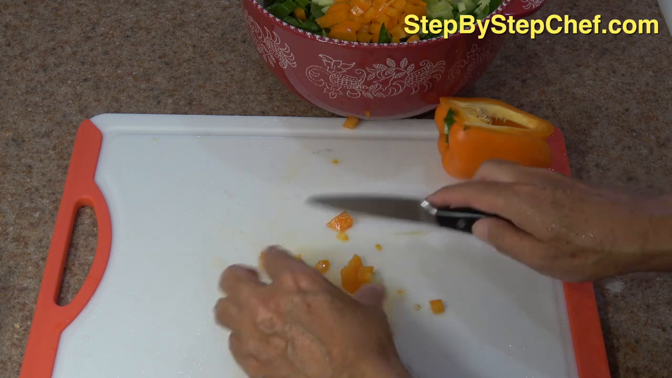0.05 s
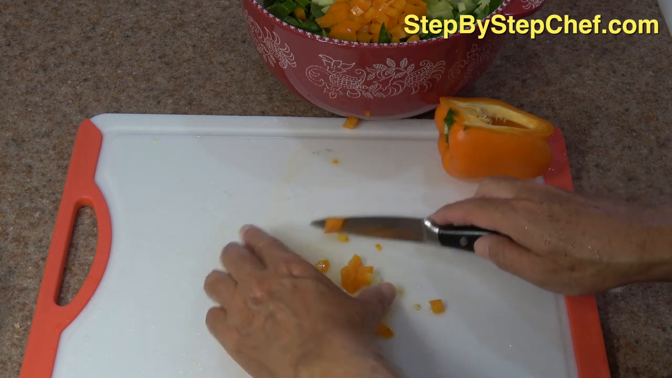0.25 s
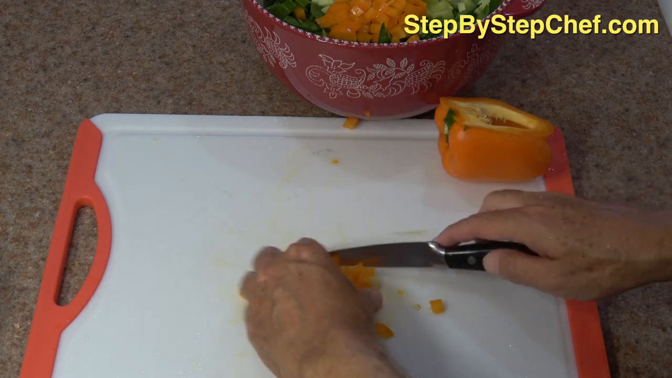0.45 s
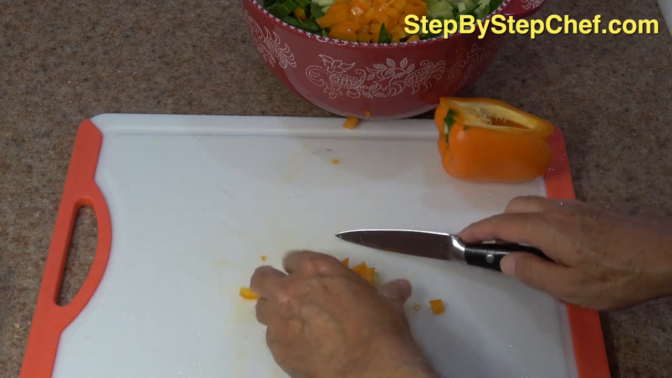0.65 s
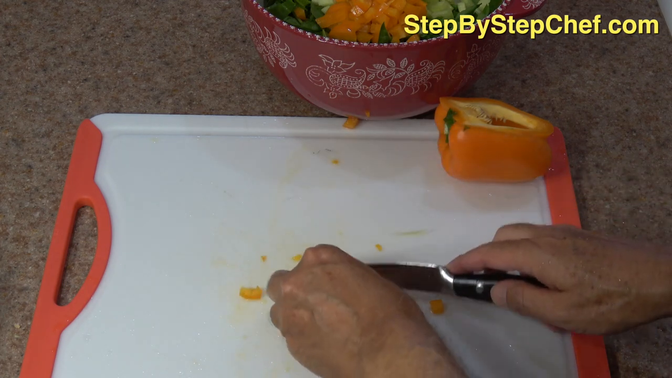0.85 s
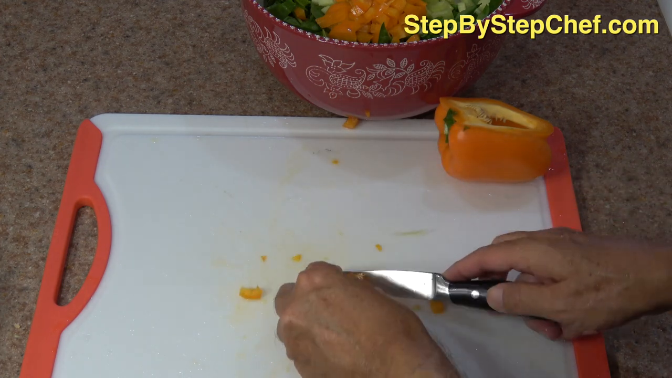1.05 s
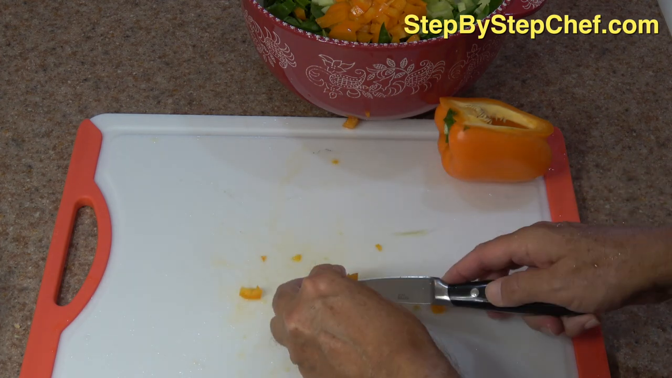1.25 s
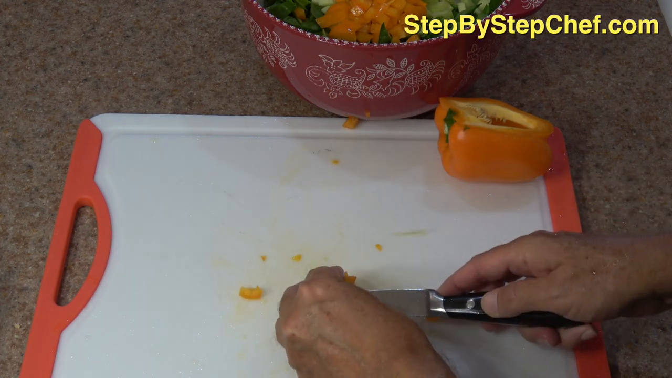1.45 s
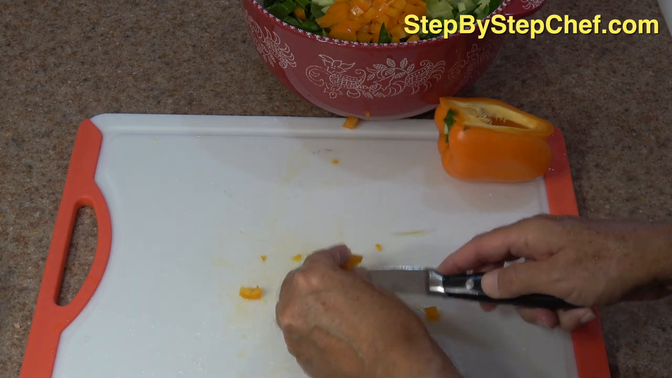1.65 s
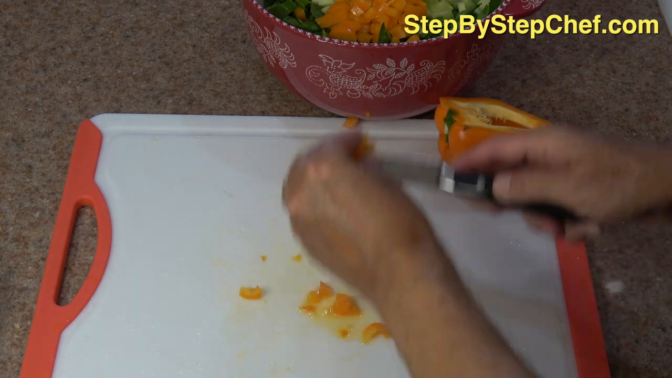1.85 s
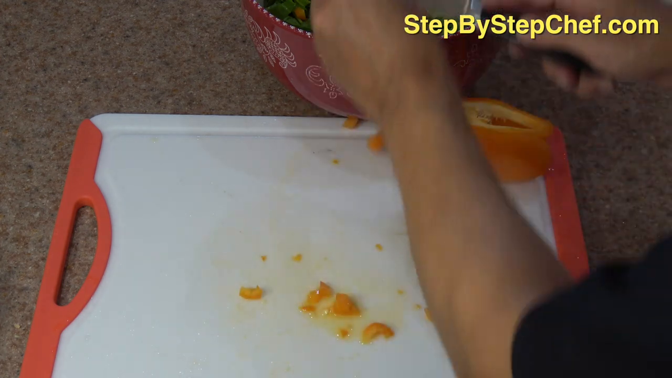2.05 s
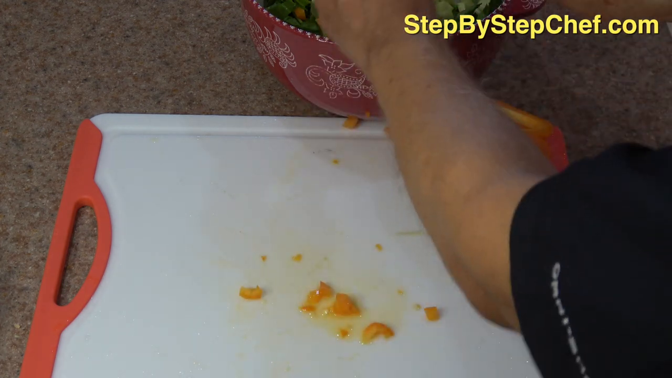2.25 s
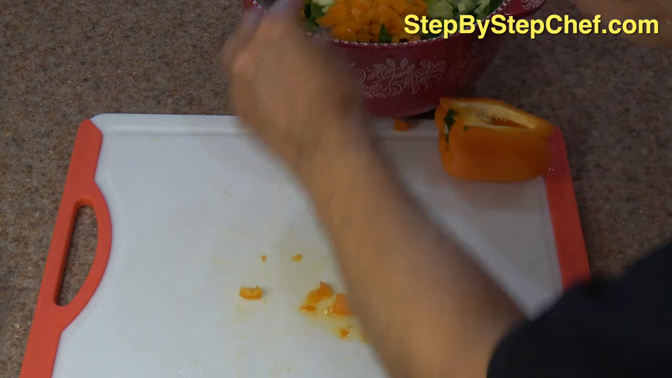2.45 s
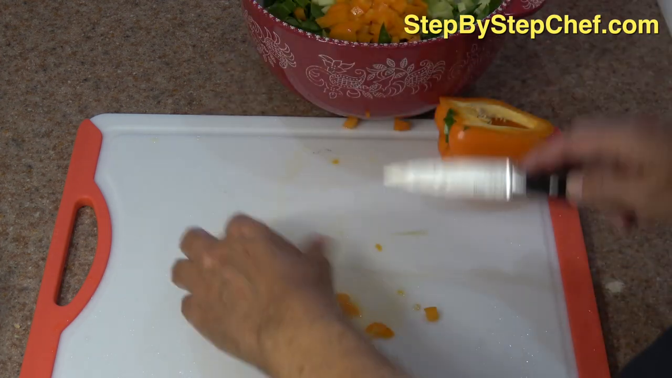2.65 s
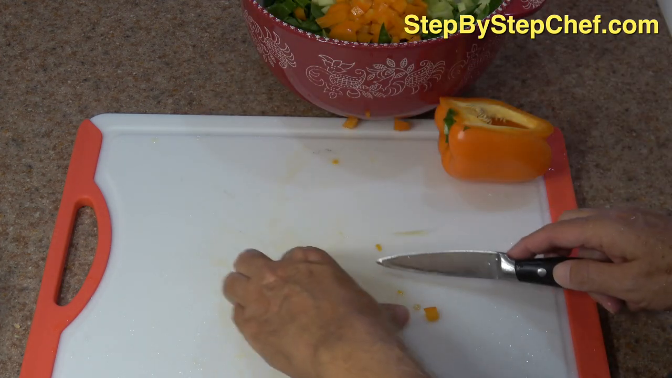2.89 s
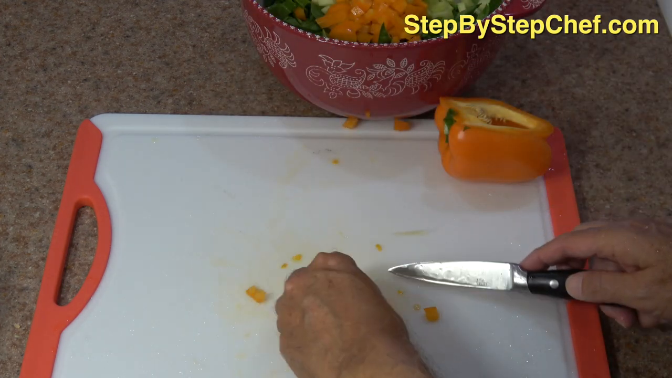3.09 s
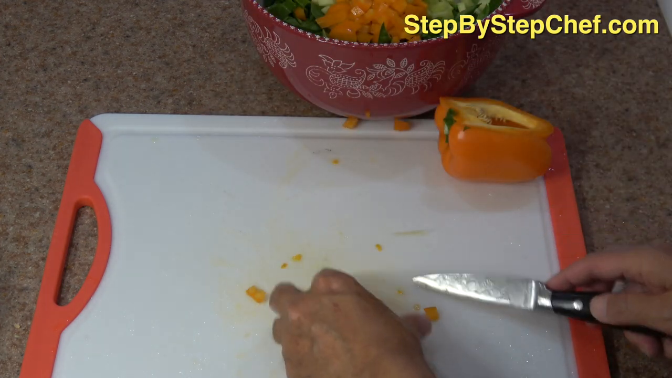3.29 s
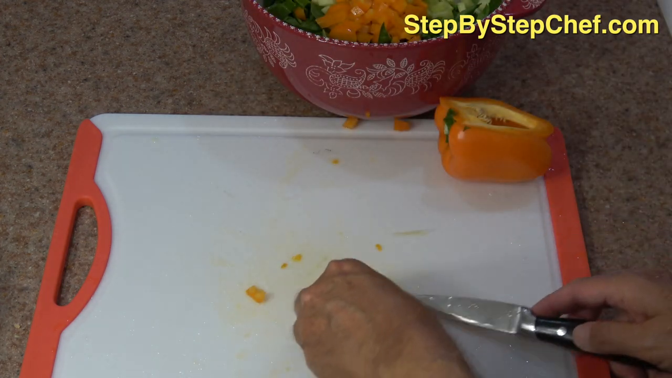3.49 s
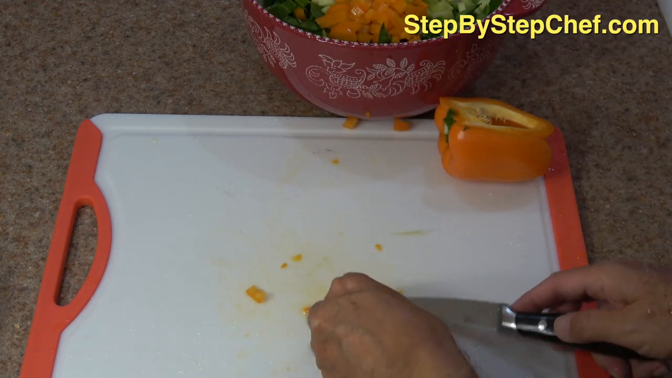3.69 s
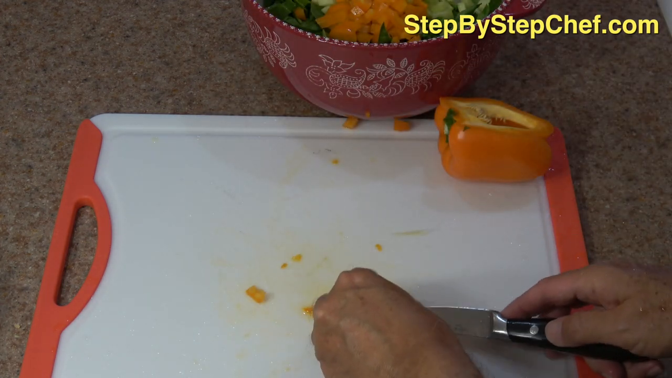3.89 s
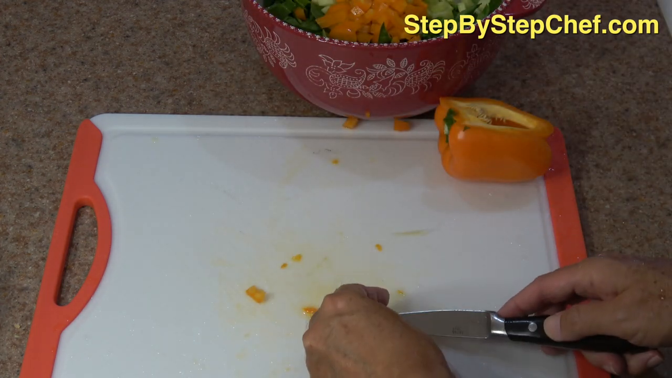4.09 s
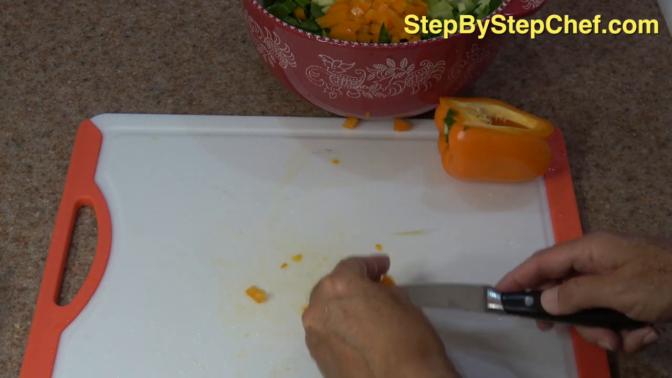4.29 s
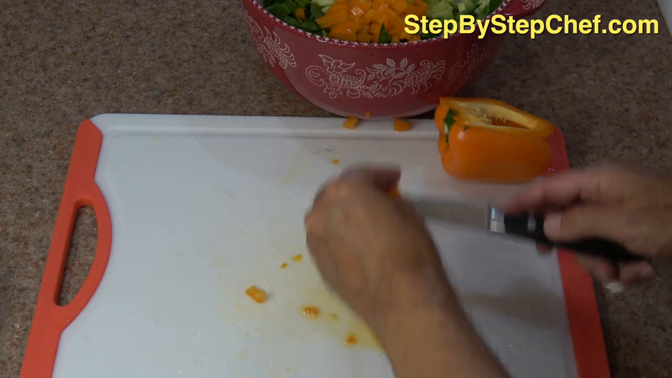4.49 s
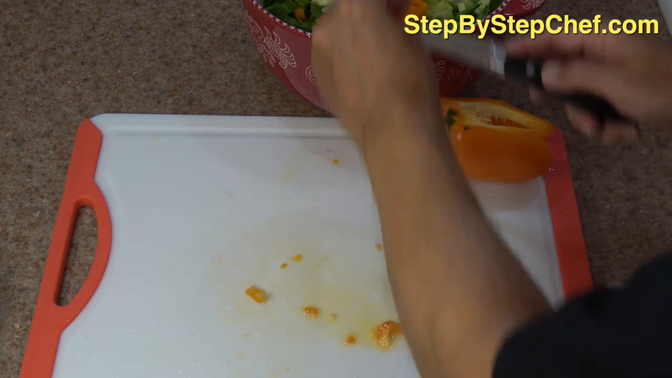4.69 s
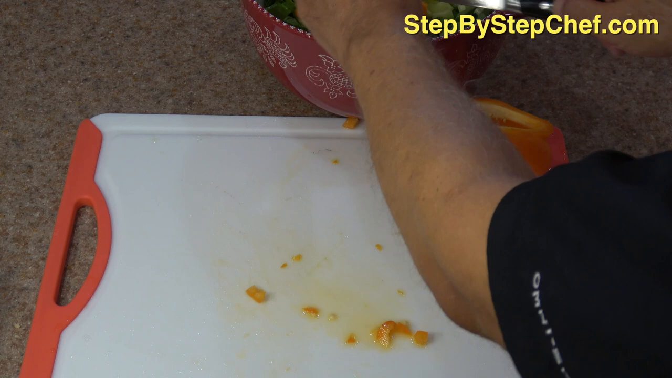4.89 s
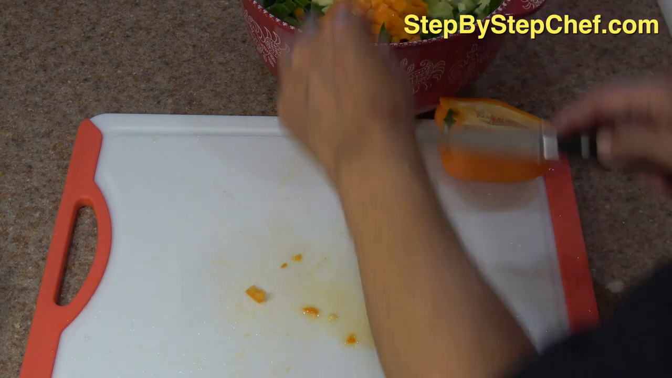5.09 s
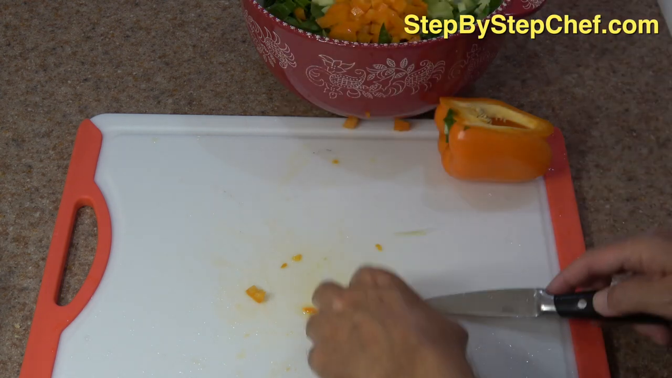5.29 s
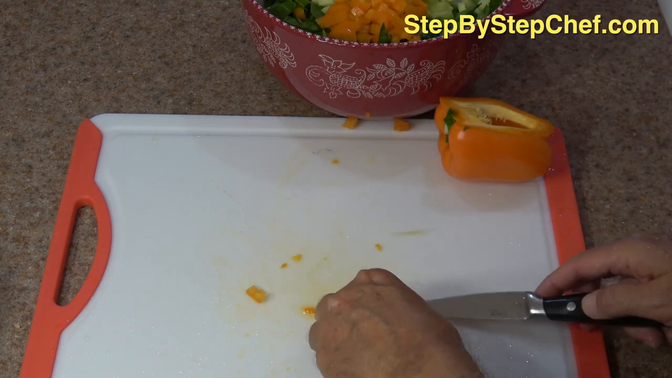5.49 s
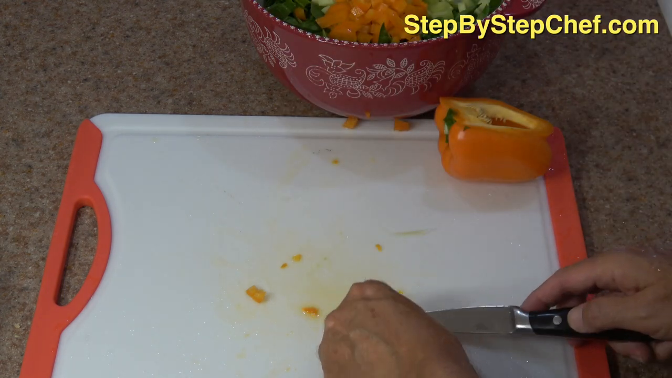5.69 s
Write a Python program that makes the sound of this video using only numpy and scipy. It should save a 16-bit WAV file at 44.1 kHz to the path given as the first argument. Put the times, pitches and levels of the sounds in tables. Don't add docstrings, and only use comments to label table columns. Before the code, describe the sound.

Close stereo pickup in a kitchen. A knife edge knocks and stutters loudly on a plastic board, scrapes again just before one second, then rubs faintly. A sleeve rustles around two seconds, a loud clack follows near three, then lighter scrapes and clinks, another rustle, and faint final scrapes over a low hum.

```python
import sys
import numpy as np
from scipy import signal
from scipy.fft import rfft, irfft, next_fast_len
from scipy.io import wavfile
from scipy.ndimage import uniform_filter1d, map_coordinates

SR = 44100
rng = np.random.default_rng(int(sys.argv[2]) if len(sys.argv) > 2 else 0)


def output_pcm(signal):
    pcm = np.clip(np.atleast_2d(signal).T, -1, 1) * 32767
    wavfile.write(sys.argv[1], SR, np.round(pcm).astype(np.int16))


def ratio(d):
    e = np.asarray(d, float) / 20
    return 10 ** e


N = 253134
TIME = np.arange(N) / SR

# f/Hz, width/Hz, level/dB
FLEX = [(195.5, 25, -8), (231.6, 15.2, 4.5), (257, 25.6, 3.5), (286.7, 17.7, 6), (389.4, 19, 2)]
# f/Hz, width/Hz, level/dB
BODY = [(605.2, 16.7, -8), (723, 68, -1.5), (763.4, 38, 2), (804, 18, -0.5), (868, 132, -12.5),
        (1071, 60, -7), (1100, 344, -13), (1267, 27, -13.5)]
# f/Hz, width/Hz, level/dB
SPINE = [(644, 150, -1.05), (770, 105, -1), (1005, 19.5, 3.7), (1258, 185, -1), (1298, 44, 0),
         (1555, 160, -0.99)]
# f/Hz, width/Hz, level/dB
BITE = [(2340, 700, 4.5), (2513, 400, 9), (3190, 1410, -1), (3710, 730, 4.5), (4030, 4200, -11.5)]
# f/Hz, width/Hz, level/dB
STEEL = [(2490, 290, -6), (2693, 183, -1), (3024, 120, -7.5), (3348, 108, 4), (3520, 390, -3),
         (4030, 170, -8.5), (4410, 112, -2.5), (4480, 350, -6), (5050, 184, -13.5), (5490, 220, -11.5)]
# f/Hz, width/Hz, level/dB
HISS = [(5660, 1800, -4), (8950, 3900, 2), (9900, 2500, 1.5)]
# f/Hz, width/Hz, level/dB
SONG = [(6700, 420, 1), (7540, 400, -12), (8350, 330, -2), (8800, 330, -2), (11050, 420, -8),
        (14500, 470, -14)]


def unit(x):
    return x / np.sqrt(np.mean(x ** 2) + 1e-20)


def along(points, hz):
    f, v = np.transpose(points)
    return np.interp(np.log(hz + 1), np.log(f + 1), v)


def sides(pan_db):
    return np.array([[.5], [-.5]]) * pan_db


def wobble(rate):
    return map_coordinates(rng.standard_normal(int(N * rate / SR) + 4), [TIME * rate])


def filtered(x, response):
    m = next_fast_len(N + SR // 2)
    return irfft(rfft(x, m) * response(np.fft.rfftfreq(m, 1 / SR)), m)[..., :N]


def patches(shape, frame_size, bin_size, spread_db):
    field = uniform_filter1d(rng.standard_normal(shape), size=bin_size, axis=0)
    return ratio(spread_db * unit(uniform_filter1d(field, size=frame_size, axis=1)))


def rush(spectrum, alike, patchy_db):
    z = signal.stft(rng.standard_normal((2, N)), nperseg=512)[2]
    z = z * patches(z.shape[1:], 12, 6, patchy_db)
    pair = signal.istft(z, nperseg=512)[1][:, :N]

    def response(hz):
        turn = np.arccos(np.clip(along(alike, hz), -1, 1)) / 2
        return ratio(along(spectrum, hz)) * [np.cos(turn), np.sin(turn)]

    mid, side = filtered(pair, response)
    return np.array([mid + side, mid - side])


def ring(modes):
    t = np.arange(SR // 8) / SR
    answer = np.zeros(len(t))
    for k, (hz, width, db) in enumerate(modes):
        decay = np.exp(-np.pi * width * t)
        answer += (-1) ** k * ratio(db) * width * decay * np.sin(2 * np.pi * hz * t)
    return answer


def rung(force, modes):
    answer = ring(modes)
    return signal.fftconvolve(force, answer / np.linalg.norm(answer))[:N]


def struck(places, size, modes):
    answer = np.convolve(ring(modes), np.hanning(5))
    return signal.fftconvolve(np.bincount(places, size, N), answer / np.abs(answer).max())[:N]


def friction(rate, spread_db, smooth):
    size = np.minimum(rng.exponential(1, N), 4)
    happens = rng.random(N) < rate / SR
    slips = happens * ratio(spread_db * size) * rng.choice([-1, 1], N)
    rub = smooth * rng.standard_normal(N)
    return unit((unit(slips) + rub) * ratio(1.2 * wobble(45)))


def traffic():
    # t/s, f/Hz, level/dB
    engine = [(0.0, 95.5, -65), (0.35, 97.7, -53), (0.602, 96, -67), (1.399, 95.8, -59), (2.0, 96, -58.5),
              (2.3, 95, -60.5), (3.3, 92.1, -60), (3.8, 91.7, -59), (4.5, 87.8, -63), (5.0, 83.6, -56.5),
              (5.74, 80.6, -51)]
    s, hz, db = np.transpose(engine)
    phase = 2 * np.pi * np.cumsum(np.interp(TIME, s, hz) + 0.727 * wobble(4.5)) / SR
    level = np.interp(TIME, s, db) + 0.65 * wobble(4.71) + sides(2.4)
    octave_db = -7
    return np.sqrt(2) * ratio(level) * (np.sin(phase) + ratio(octave_db) * np.sin(2 * phase))


def beat(k):
    neighbours = {1: (.57, 3.4, -5), 2: (2.18, 2.57, -10)}
    hz, s, db = neighbours.get(k, (0, 0, -100))
    return 1 + ratio(db) * np.exp(2j * np.pi * hz * (TIME - s))


def room_air():
    # f/Hz, density/dB
    air_colour = [(20, -11), (90, -23), (140, -16), (300, -16.5), (520, -21), (760, -19), (1200, -17),
                  (1400, -26.5), (1750, -37), (4000, -40.5), (10000, -40.5), (16000, -50)]
    # f/Hz, likeness 0-1
    air_alike = [(38, 0.99), (60, 0.76), (300, 0.87), (1000, 0.95), (4000, 1), (8000, 0.057), (14000, 0.39)]
    # f/Hz, left-right level/dB
    air_lean = [(42, 1.5), (60, 3), (300, 2), (1200, 4), (4000, -0.8)]
    air = rush(air_colour, air_alike, patchy_db=1.1)
    air = filtered(air, lambda hz: ratio(sides(along(air_lean, hz))))
    upper = filtered(air, lambda hz: hz > 250)
    air_db = -54
    return ratio(air_db) * air / np.std(upper)


def fridge():
    # t/s, load/dB, cabinet shake/dB
    compressor = [(0.0, -2.5, -3), (0.34, 1, 5), (0.61, -2.5, 1), (1.202, -1, 7), (2.6, 3.5, -4),
                  (3.3, -0.5, 8), (4.3, 2, -4), (4.8, 1, -4), (5.35, 2, 2)]
    # multiple, level/dB, left-right level/dB
    steady = [(1, -63, -4), (3, -53.5, 1.9), (4, -61.5, -4.5)]
    # f/Hz, density/dB
    cabinet = [(20, -1), (30, -15), (45, 0), (70, -3), (92, -1), (110, 5), (140, -30.5)]
    hum_hz, loaded_db, rumble_db = 57.91, -52.5, -71.5
    s, load, shake = np.transpose(compressor)
    load, shake = np.interp(TIME, s, load), np.interp(TIME, s, shake)
    phase = 2 * np.pi * np.cumsum(hum_hz + 0.048 * wobble(1.38)) / SR
    hum = np.zeros((2, N))
    for k, db, pan in steady + [(2, loaded_db + load, 3.4)]:
        level = db + 0.96 * wobble(4.58) + sides(pan)
        turning = np.exp(1j * (k * phase + rng.uniform(0, 2 * np.pi)))
        hum += np.sqrt(2) * ratio(level) * np.imag(beat(k) * turning)
    rumble = unit(rush(cabinet, [(60, 1.0)], patchy_db=2.5))
    return hum + ratio(rumble_db + shake + np.array([[4.], [2.5]])) * rumble


def sleeve():
    # t/s, level/dB
    reaches = [
        [(1.6, -64), (1.67, -109), (1.964, -64), (2.132, -56.5), (2.184, -58), (2.584, -65), (2.76, -68)],
        [(4.3, -104), (4.53, -75), (4.65, -62.5), (4.808, -56), (4.918, -61), (5.5, -67)],
    ]
    # f/Hz, density/dB
    cloth_colour = [(880, -73), (1500, 1), (2720, -4), (3090, -5), (6830, -7.5), (10900, -13.5),
                    (16000, -20)]
    rows = []
    for reach in reaches:
        rows += [(reach[0][0] - .004, -100), *reach, (reach[-1][0] + .008, -100)]
    s, db = np.transpose(rows)
    level = np.interp(TIME, s, db) + 1.5 + 0.052 * wobble(4.5)
    return ratio(level) * unit(rush(cloth_colour, [(2000, 0.99), (10000, 1.0)], patchy_db=0.6))


def kitchen(x):
    # t/s, level/dB, left-right level/dB
    near_echoes = [
        (.0043, -16.5, -0.5),
        (.0065, -12.5, -4),
        (.011, -20.5, -0.5),
    ]
    # f/Hz, t60/s
    decay = [(200, 0.34), (1000, 0.46), (4000, 0.36), (12000, 0.54)]
    # f/Hz, side level/dB
    tail_width = [(250, -28), (520, -13), (1500, -41), (3000, -101), (6000, -6), (10000, -12)]
    tail_db = -5.5
    dull = uniform_filter1d(x, size=3)
    near = x
    for s, db, pan in near_echoes:
        near = near + ratio(db + sides(pan)) * np.pad(dull, (round(s * SR), 0))[:N]
    hz, t, z = signal.stft(rng.standard_normal((2, SR // 2)), SR, nperseg=256)
    fade = ratio(-60 * t / along(decay, hz)[:, None])
    tail = signal.istft(z * fade, SR, nperseg=256)[1]
    tail = tail / np.linalg.norm(tail[0])
    late = signal.fftconvolve(np.pad(x, (500, 0))[None], tail, axes=1)[:, :N]
    side = filtered(late[1], lambda hz: ratio(along(tail_width, hz)))
    return near + ratio(tail_db) * np.array([late[0] + side, late[0] - side])


def mirror(hz):
    gap_hz, gap_wide_hz, gap_db, dull_hz = 1846, 483, -5, 10500
    rise, wide = gap_hz ** 2 - hz ** 2, 1j * hz * gap_wide_hz
    gap = (rise + ratio(gap_db) * wide) / (rise + wide)
    return gap / (1 - (hz / dull_hz) ** 2 + 1.3j * hz / dull_hz)


def ticks():
    # t/s, level/dB, three notes f/Hz
    landings = [
        (2.357, -49, 3585, 5660, 8600),
        (2.679, -39, 3400, 4720, 6680),
    ]
    out = np.zeros(N)
    for s, db, *tones in landings:
        modes = [(hz, 180, -4.5 * k) for k, hz in enumerate(tones)]
        out += struck([round(s * SR)], [ratio(db)], modes)
    return out


def clinks():
    # t/s, peak level/dB
    tip_contacts = [(.253, -39), (.260, -38), (.270, -40), (.278, -38), (.291, -38), (.302, -43),
                    (.317, -41), (.331, -42), (.340, -39), (.361, -43), (.374, -45), (.384, -43),
                    (.390, -41), (.402, -45), (.413, -39), (.422, -40), (.429, -41), (.775, -37),
                    (.785, -40), (.795, -39), (.835, -41), (.868, -38), (.896, -39), (.919, -38),
                    (3.517, -46), (3.536, -44), (3.545, -44), (3.559, -43), (3.576, -45), (3.589, -41),
                    (3.597, -39), (3.608, -38), (3.8, -44), (3.82, -46), (3.828, -46), (3.886, -46),
                    (3.903, -35), (3.946, -39), (5.361, -55), (5.518, -51), (5.537, -50), (5.576, -40),
                    (5.598, -48), (5.626, -51), (5.691, -42)]
    # f/Hz, width/Hz, level/dB
    tip_notes = [(6680, 230, 0), (8450, 330, -9), (11050, 300, -11)]
    s, db = np.transpose(tip_contacts)
    return struck(np.round(s * SR).astype(int), ratio(db + 3), tip_notes)


def scuffs():
    # t/s, bite peak level/dB, body level/dB, hiss level/dB, length/ms
    catches = [(0.753, -25, -9, -11, 27), (0.869, -20, -6, -11, 56), (0.82, -15, -10, -29, 30),
               (0.919, -21, -14, -15, 53), (1.006, -26, -5, -22, 19), (1.2366, -48, 7.5, 0.5, 110),
               (1.271, -34.5, 6, -1.5, 45), (1.412, -40, 15, 6.5, 38), (2.86, -14.5, 3, -14, 32),
               (3.086, -34, 9, -12, 44), (3.192, -35, 6.5, -15, 49), (3.351, -50, 9, -2, 20),
               (3.498, -35, 6, -8, 28), (3.513, -34, 8.5, -13, 60), (3.532, -32, -8, -8, 54),
               (3.608, -21, 5, -11.5, 40), (3.797, -24.5, -2.5, -13, 31), (3.809, -26.5, 5.5, -5.5, 19),
               (3.8957, -20.5, -10, -5, 44), (3.947, -33, -4, 2, 22), (4.038, -40.5, 0, -6, 49),
               (5.226, -45.5, -2, -8, 28), (5.357, -52, -6, -25, 27), (5.562, -31, 3, -10, 32),
               (5.579, -25, 2.5, -18, 37), (5.646, -33.5, 5.5, -6, 42), (5.686, -32, 2.5, -7.5, 73)]
    s, bite, body, hiss, ms = np.transpose(catches)
    t = np.arange(SR // 10) / SR
    swell = 1 - np.exp(-t / .0025)
    burst = swell * ratio(-60000 * t / np.clip(ms, 3, 90)[:, None])
    places = (np.round(s * SR).astype(int)[:, None] + np.arange(len(t))).ravel()
    grit = friction(3000, spread_db=5.0, smooth=1.05)
    song_grit = np.roll(grit, 60)
    parts = [(SPINE, bite + body - 4, grit), (BITE, bite - 11, grit), (STEEL, bite - 3, grit),
             (HISS, bite + hiss - 16, grit), (SONG, bite + hiss - 6, song_grit)]
    out = np.zeros(N)
    for modes, db, force in parts:
        bursts = (ratio(db)[:, None] * burst).ravel()
        out += rung(force * np.bincount(places, bursts, N + len(t))[:N], modes)
    return out


def knocks():
    # t/s, bite peak level/dB, body level/dB, flex level/dB, hiss level/dB
    hits = [
        (0.1819, -7, -3, -10, -24),
        (0.2409, -12.5, 8, -32, -44),
        (0.2776, -19, 13, 10, -27.5),
        (0.3164, -20.5, 18, 7.5, -33),
        (0.6665, -26.5, 11, 12.5, -36),
        (0.7659, -32.5, 14.5, -24, -25),
        (3.5856, -38, -8, -25, -24),
    ]
    # t/s, bite peak level/dB, body level/dB, flex level/dB, hiss level/dB
    flat_taps = [
        (1.0764, -41.5, 25.4, 12, -27),
        (2.097, -46, 31.3, 18, -9),
        (2.789, -44, 22, 19, -14),
        (2.8245, -40, 23, -11, -24),
        (2.858, -10.5, 5.3, -8, -38),
        (3.083, -39, 18, -6, -24),
    ]
    # f/Hz, width/Hz, level/dB
    hollow_air = [(534, 170, -5), (759, 43, 12.5), (1290, 250, -6.5), (1520, 170, -7)]
    # f/Hz, width/Hz, level/dB
    flat_notes = [(2690, 330, 8.5), (3210, 210, 11), (3290, 230, 5.5), (3620, 250, 8.5), (5700, 720, -2),
                  (9050, 340, -6)]
    s, bite, body, flex, hiss = np.transpose(hits + flat_taps)
    hollow = np.array([0.47] * len(hits) + [0.91] * len(flat_taps))
    places = np.round((s + 0.001493) * SR).astype(int)
    low = ratio(bite + body - 7.0)
    parts = [(BODY, low * (1 - hollow)), (hollow_air, low * hollow), (FLEX, ratio(bite + flex - 9.5)),
             (flat_notes, ratio(bite + 1.0) * hollow), (SONG[:3], ratio(bite + hiss + 2))]
    return sum(struck(places, size, modes) for modes, size in parts)


def stutter():
    # t/s, snap peak level/dB, crack level against the snap/dB
    slip_events = [(.1833, -7, -10), (.2285, -22, -10), (.2366, -14, -9), (.2412, -8.5, -10),
                   (.2495, -11, -11), (.2553, -17, -12), (.2604, -6.5, -9), (.2703, -15, -8),
                   (.2793, -6.5, -7), (.2919, -12, -8), (.3022, -14, -14), (.3172, -11, -18),
                   (.333, -14, -16), (.3517, -17, -16), (.366, -19, -16), (.3813, -21, -16),
                   (.6682, -25, -14), (.7673, -15, -14), (.7809, -21, -10), (.7969, -23, -9),
                   (.8053, -21, -10), (.8194, -22, -8), (.8341, -22, -9), (.8487, -18, -16),
                   (.8703, -18, -12), (.8769, -20, -10), (.8855, -18, -14), (.9027, -21, -12),
                   (.9123, -20, -14), (.9249, -19, -10), (.9314, -20, -14), (1.053, -29, -16),
                   (2.0993, -27, -22), (3.5209, -29, -9), (3.5397, -30, -8), (3.5697, -30, -9),
                   (3.5875, -25, -9), (3.6208, -28, -8), (3.8975, -27, -8), (1.831, -46, -20),
                   (2.027, -43, -20), (5.361, -40, -14)]
    # f/Hz, width/Hz, level/dB
    snap_modes = [(1120, 380, 0)]
    # f/Hz, width/Hz, level/dB
    crack_modes = [(3760, 1250, -6), (4610, 630, -6), (5080, 400, -16.5), (10200, 1500, -38)]
    rebound_s, rebound_db = .0043, -6
    s, snap, crack = np.transpose(slip_events)
    places = np.round(s * SR).astype(int)
    slip = struck(places, ratio(snap + crack), crack_modes) - struck(places + 12, ratio(snap), snap_modes)
    return slip + ratio(rebound_db) * np.roll(slip, round(rebound_s * SR))


def strokes():
    # t/s, length/s, first level/dB, last level/dB, brightness/dB
    light_drags = [(0.0, 0.071, -34.5, -47, -7), (.068, 0.18, -51, -60, -1), (.19, 0.031, -24, -36, 3),
                   (.226, 0.0073, -24, -19.5, -4), (.24, 0.12, -20.5, -31, 1),
                   (2.108, 0.084, -38, -66, -16), (2.24, 0.038, -55, -71, 5),
                   (2.76, 0.088, -47.5, -30.5, -5.5), (2.88, 0.18, -35.5, -38.5, -1.5),
                   (3.062, 0.033, -46, -44.5, 10.5), (3.097, 0.054, -49.5, -67, 17)]
    # t/s, length/s, first level/dB, last level/dB, brightness/dB
    hand_presses = [(.335, 0.082, -28, -31.5, 1.5), (.42, 0.24, -32, -62, 4.5),
                    (.675, 0.064, -34.5, -56, 0), (.741, 0.024, -24, -26.5, -6.5),
                    (.768, 0.06, -22, -25, 3.5), (.815, 0.045, -37, -22.5, 1),
                    (.868, 0.066, -21.5, -24, -1.5), (.942, 0.1114, -41, -32.5, -1.5),
                    (1.087, 0.072, -47, -63.5, 9), (1.16, 0.086, -49.5, -45.5, -3),
                    (1.274, 0.19, -47.5, -74, 9.5), (1.412, 0.03, -42.5, -34.5, 5.5),
                    (1.44, 0.076, -46.5, -65, 9.5), (3.18, 0.23, -53.5, -70, 8.5),
                    (3.35, 0.046, -50, -80, 6.5)]
    # t/s, length/s, first level/dB, last level/dB, brightness/dB
    flat_strokes = [(3.466, 0.033, -48, -43, -7), (3.502, 0.13, -36.5, -35, 0),
                    (3.585, 0.023, -36, -31.5, 3.5), (3.62, 0.17, -46.5, -55, 6), (3.8, 0.025, -57, -33, 0),
                    (3.826, 0.068, -35.5, -51.5, -4), (3.886, 0.007, -52, -37.5, 11.5),
                    (3.898, 0.056, -42, -41, 7.5), (3.986, 0.073, -47.5, -45, 1),
                    (4.072, 0.13, -57, -64, 0), (5.361, 0.049, -42.5, -65, -3.5),
                    (5.43, 0.12, -66, -51, -8), (5.508, 0.051, -54, -55, 2), (5.563, 0.026, -43, -38, 9),
                    (5.586, 0.14, -41.5, -50.5, -1.5)]
    # flex/dB, bite/dB, hiss/dB, steel share of the bite 0-1, blade's song share of the hiss 0-1
    grips = [(light_drags, (-6, -6, -25.5, 0.43, 0)), (hand_presses, (-0.5, -10, -28, 0.16, 1)),
             (flat_strokes, (-5, -5.5, -17, 0.8, 0.4))]
    hiss_grows = 1.53
    touch_s, lift_s = .004, .009
    power = np.zeros((7, N))
    for rows, (flex, bite, hiss, steel, song) in grips:
        for s, length, first, last, bright in rows:
            corners = [s - touch_s, s, s + length, s + length + lift_s]
            span = (TIME > corners[0]) & (TIME < corners[-1])
            db = np.interp(TIME[span], corners, [first - 20, first, last, last - 20])
            edge = ratio(2 * (bite + bright))
            top = ratio(2 * (hiss + hiss_grows * bright))
            shares = [ratio(2 * flex), 1 - steel, steel, edge * (1 - steel), edge * steel,
                      top * (1 - song), top * song]
            power[:, span] += np.outer(shares, ratio(2 * db))
    return np.sqrt(power)


def patched(x, patchy_db):
    z = signal.stft(x, nperseg=256)[2]
    return signal.istft(z * patches(z.shape, 9, 4, patchy_db), nperseg=256)[1][:N]


def scrape():
    # f/Hz, width/Hz, level/dB
    palm_modes = [(2950, 620, -6), (3560, 460, 2.5), (4500, 1450, -7)]
    palm_db, palm_t60_s = -47.5, 0.53
    coarse = friction(900, spread_db=2.0, smooth=0.63)
    fine = friction(2500, spread_db=3.5, smooth=0.66)
    body = coarse * ratio(-2.5)
    edge = unit(fine + 0.31 * coarse) * ratio(-2.0)
    top = fine * ratio(-7.5)
    parts = [(FLEX, -body), (BODY, body), (SPINE, body), (BITE, edge), (STEEL, edge),
             (HISS, top), (SONG, np.roll(top, SR // 100))]
    rub = rung(np.roll(coarse, SR) * ratio(palm_db - 60 * TIME / palm_t60_s), palm_modes)
    for (modes, force), gain in zip(parts, strokes()):
        rub = rub + rung(force * gain, modes)
    return patched(rub, patchy_db=2.0)


def scene():
    # f/Hz, left-right level/dB
    board_lean = [(300, 1), (600, -0.9), (1000, 0.5), (1300, 0.76), (6000, -0.6)]
    board = scrape() + stutter() + knocks() + scuffs() + ticks() + clinks()
    small = signal.butter(4, 190, "high", fs=SR, output="sos")
    board = filtered(signal.sosfilt(small, board), mirror)
    board = filtered(kitchen(board), lambda hz: ratio(sides(along(board_lean, hz))))
    return board + sleeve() + room_air() + fridge() + traffic()


def band_limit(x):
    return signal.sosfilt(signal.butter(12, 16490, fs=SR, output="sos"), x)


def record(dry):
    mix = filtered(dry, lambda hz: hz < 15800)
    return band_limit(mix)


dry = scene()
out = record(dry)
output_pcm(out)
```